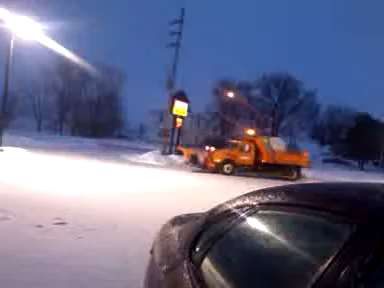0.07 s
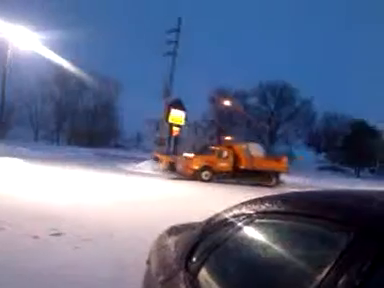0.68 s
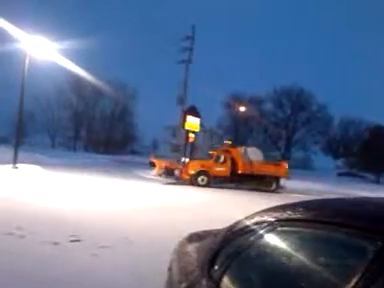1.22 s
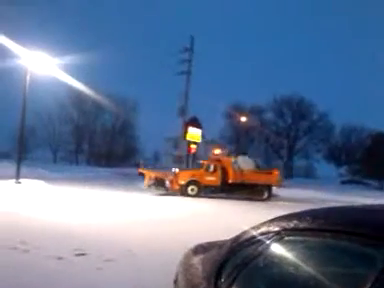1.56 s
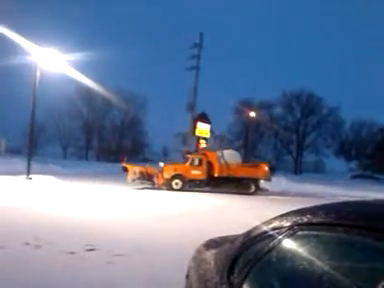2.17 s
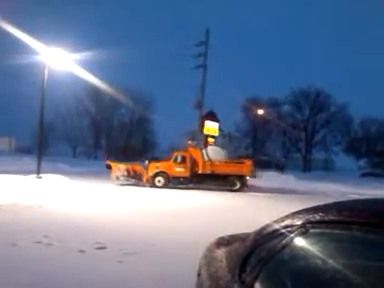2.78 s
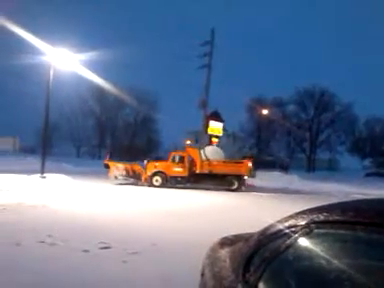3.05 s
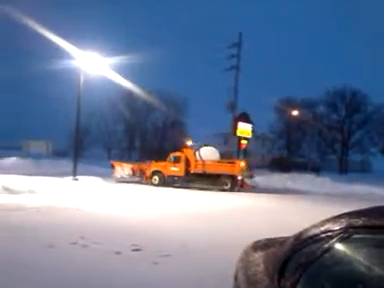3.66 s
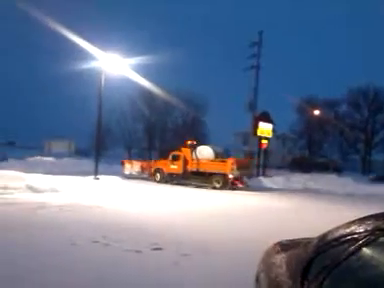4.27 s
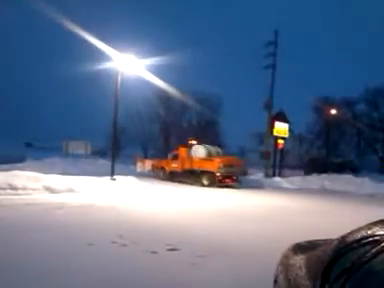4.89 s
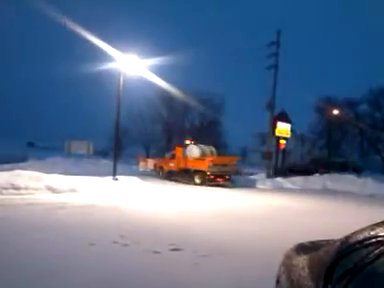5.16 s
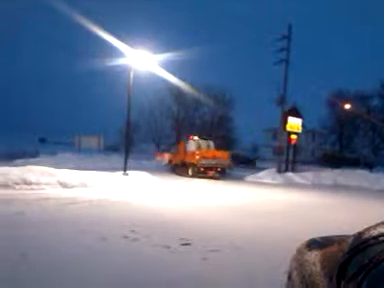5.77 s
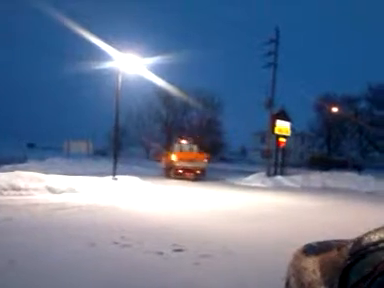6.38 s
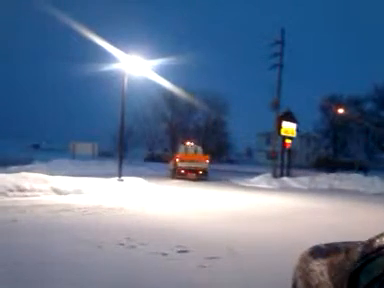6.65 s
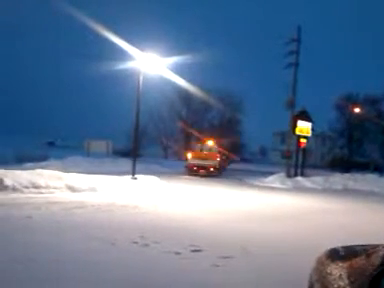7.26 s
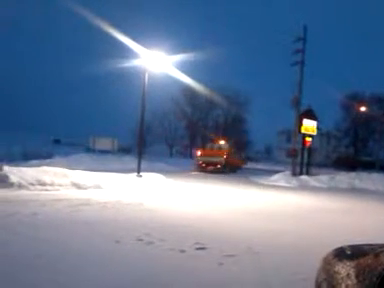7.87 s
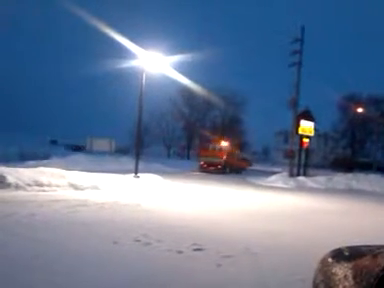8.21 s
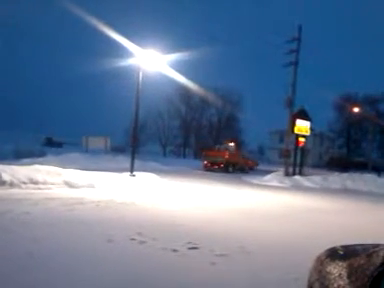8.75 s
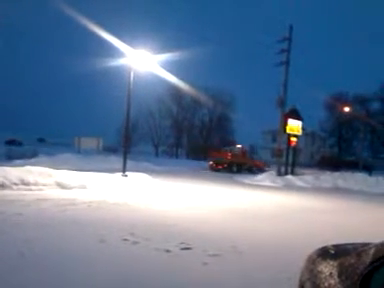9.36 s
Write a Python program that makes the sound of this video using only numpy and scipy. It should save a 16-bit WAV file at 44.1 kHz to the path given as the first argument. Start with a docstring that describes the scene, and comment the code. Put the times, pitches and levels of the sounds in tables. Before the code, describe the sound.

A diesel plow truck drives across a snowy lot, its blade faintly scraping, while gusty wind buffets the microphone.

```python
"""Plow truck on a windy, snowy lot

A diesel plow truck crosses the lot and turns away, its exhaust and roar pulsing with the firing,
its steel blade scraping and squeaking faintly. A low hum, like an idling car, lies underneath.
The microphone is a narrow-band phone out in the wind: gusts buffet its port and overload it,
and right at the microphone a finger ticks once on the case."""
import sys
import numpy as np
from scipy.fft import rfft, irfft, next_fast_len
from scipy.io import wavfile
from scipy.ndimage import uniform_filter1d, map_coordinates

SR = 44100
rng = np.random.default_rng(int(sys.argv[2]) if len(sys.argv) > 2 else 0)


def file_out(sig):
    """Save sig as 16-bit WAV at sys.argv[1]."""
    # one column per channel
    cols = np.atleast_2d(sig).T
    # limit, then scale
    lim = np.clip(cols, -1, 1)
    pcm = np.round(lim * 32767).astype(np.int16)
    wavfile.write(sys.argv[1], SR, pcm)


N = 425124


def truck(pulsing=0.21, jitter=0.02, rough_db=4, flicker_db=1.37, roar_trim_db=1.5, scrape_trim_db=3):
    """Three exhaust orders, with combustion roar and clatter that swell at each firing."""
    # Each row: time in seconds, firing rate in Hz.
    firing_rate = [(.7, 111.9), (2.5, 116.3), (4.7, 118.6), (5.2, 103.1), (5.7, 107), (6.3, 117),
                   (7, 117.9), (7.8, 118.4), (8.6, 116), (9.7, 118.8)]
    # Each row: time in seconds, exhaust level in dB at the firing rate and at three times that rate.
    exhaust_levels = [(.7, -37, -47), (2.5, -37.5, -47), (4, -33.5, -57), (4.7, -29.5, -51.5),
                      (5.2, -34, -49.5), (5.6, -37, -37.5), (6, -31, -57), (6.6, -33, -48.5),
                      (7.2, -34.5, -47), (7.7, -44, -43.5), (8.3, -33, -48), (9.7, -39.5, -44.5)]
    # Distance and heading set the noise. Each row: time in seconds, roar and clatter in dB before trim.
    pass_levels = [(.7, -42, -50), (1.15, -38.5, -43), (1.45, -38, -47), (2.2, -40.5, -45),
                   (2.95, -38, -43), (3.55, -38, -44.5), (3.98, -34, -43), (4.3, -40, -45.5),
                   (4.6, -35.5, -45.5), (5.3, -40, -44.5), (5.7, -39, -46.5), (6.0, -39, -44.5),
                   (6.45, -39.5, -48), (7.2, -43, -49.5), (7.75, -38, -47.5), (8.4, -42.5, -48),
                   (9.1, -40, -47), (9.64, -40.5, -47.5)]
    # Engine roar, then clatter and scrape. Each row: frequency in Hz, relative density in dB.
    roar_spectrum = [(25, -35.5), (60, -2), (85, 6.5), (130, 1), (230, -2.5), (330, -3), (470, -3.5),
                     (620, -0.5), (760, -1.5), (930, -4.5), (1300, -10.5), (2000, -26), (3500, -45)]
    scrape_spectrum = [(400, -17), (1000, 0), (1400, 4), (1900, 3), (2500, 2.5), (3200, 0), (4500, -8)]
    phase = turning(curves(firing_rate)[0] * (1 + jitter * wobble(30)))
    first_db, third_db = curves(exhaust_levels)
    roar_db, clatter_db = curves(pass_levels)
    orders = [(1, first_db), (2, first_db - 11), (3, third_db)]
    exhaust = sum(np.sqrt(2) * amp(db + rough_db * wobble(26)) * np.sin(k * phase) for k, db in orders)
    # six unequal cylinders repeat their pattern every two turns of the crank
    firing = unit(1 + pulsing * np.cos(phase) + 0.15 * np.cos(phase / 6))
    roar = amp(roar_db + roar_trim_db + flicker_db * wobble(16)) * noise(roar_spectrum)
    clatter = amp(clatter_db + scrape_trim_db + flicker_db * wobble(25)) * noise(scrape_spectrum)
    return exhaust + firing * (roar + clatter)


def blade(drone_hz=752, stutter_db=3.5, drone_trim_db=-0.5):
    """The steel blade drones as it drags, and rings or squeaks where it catches on packed snow."""
    # Each row: time in seconds, drone level in dB before trim.
    drag_levels = [(.7, -56), (2.5, -52), (3.0, -42.5), (3.6, -44.5), (4.2, -42.5), (5.1, -56.5),
                   (5.55, -43.5), (6.1, -54.5), (7.1, -51), (7.9, -53), (9.7, -56.5)]
    # Each row: peak time in seconds, half length in seconds, pitch in Hz, level in dB.
    squeaks = [(1.573, 0.073, 3320, -54.5), (2.983, 0.16, 3327, -50), (4.02, .2, 2436, -47),
               (4.023, .16, 1330, -46), (4.661, 0.25, 2386, -50)]
    drone_db, = curves(drag_levels)
    drone_gain = amp(drone_db + drone_trim_db + stutter_db * wobble(22))
    steel = drone_gain * np.sin(turning(drone_hz * (1 + 0.065 * wobble(110))))
    for s, length, hz, db in squeaks:
        ring = np.sin(turning(hz * (1 + 0.067 * wobble(220))))
        steel += amp(db + stutter_db * wobble(45)) * swell(s, length) * ring
    return np.sqrt(2) * steel


def wind(buffet_db=-3, flutter_db=-7, brightening=0.2, lump_db=3, lull_db=-30, limit=0.65):
    """Turbulence at the microphone port: low buffeting, and a patter that grows with the air speed."""
    # Buffeting, then the patter of small eddies. Each row: frequency in Hz, relative density in dB.
    buffet_spectrum = [(20, -62.5), (32, -40.5), (46, -25), (62, -11.5), (105, 1), (170, 1), (240, -6.5),
                       (330, -17), (450, -25.5), (800, -54)]
    flutter_spectrum = [(30, -51.5), (80, -15.5), (160, -1), (270, 1.5), (360, -6), (460, -13),
                        (600, -22.5), (900, -32.5), (1400, -40.5), (3500, -46)]
    level_db = wind_strength()
    lull_gain = 1 / (1 + amp(2 * (lull_db - level_db)))  # in the lulls the wind gives way to the engines
    buffet = amp(level_db + buffet_db + lump_db * wobble(55)) * even(noise(buffet_spectrum), span=0.025)
    patter = unit(coloured(puffs(rate=42, scatter_db=14), flutter_spectrum))
    flutter = amp(level_db + flutter_db + brightening * (level_db + 15.5)) * patter
    pressure = lull_gain * (buffet + lull_gain * flutter)
    # a soft limit keeps the wind's rumble rounded and free of clicks
    return limit * np.tanh(pressure / limit)


def wind_strength(unrest_db=3):
    """Strength of the wind in dB: gusts add their power to a restless breeze."""
    # Each row: time in seconds, relative strength between gusts in dB.
    breeze = [(.75, -23.5), (1.35, -17), (1.55, -19.5), (2.1, -16.5), (3.0, -17), (3.4, -23), (3.9, -17.5),
              (4.2, -25.5), (4.75, -22), (5.6, -27.5), (6.0, -19.5), (6.6, -25.5), (7.2, -23), (7.7, -31),
              (8.1, -20.5), (8.55, -22), (9.05, -26), (9.4, -27.5)]
    # Each row: peak time in seconds, half length in seconds, relative strength in dB.
    gusts = [(0.972, 0.15, -8), (1.276, 0.13, -10.5), (1.663, 0.041, -15), (1.887, 0.097, -8),
             (2.194, 0.12, -16.5), (2.513, .05, -15), (2.811, .06, -16), (3.105, 0.045, -15),
             (3.499, .07, -20), (3.834, .04, -15), (4.026, .045, -16.5), (4.252, .025, -15.5),
             (4.595, 0.13, -16.5), (5.046, .1, -21.5), (5.397, .04, -22.5), (5.822, 0.087, -18.5),
             (6.196, .12, -25), (6.832, 0.039, -12), (6.988, 0.048, -16), (7.366, .02, -19),
             (7.944, 0.075, -10.5), (8.17, 0.17, -15), (8.719, .025, -12), (8.844, 0.051, -12.5),
             (9.594, 0.04, -18)]
    breeze_db, = curves(breeze)
    power = amp(breeze_db + unrest_db * wobble(22)) ** 2
    for s, length, db in gusts:
        power += (amp(db) * swell(s, length)) ** 2
    return 10 * np.log10(power)


def puffs(rate, scatter_db):
    """An irregular train of pushes and pulls of air, about rate a second, of scattered size."""
    gap, direction, strength = rng.random((2000, 3)).T
    at = (np.cumsum(0.25 + 1.5 * gap) * SR / rate).astype(int)
    sizes = np.sign(direction - 0.5) * amp(scatter_db * strength)
    return np.bincount(at[at < N], sizes[at < N], N)


def eddies(trim_db=-4, steepness=4.11, rasp_db=-25, low_cut_hz=190, rise_ratio=0.86):
    """Each strong eddy thumps on the port: a brief puff that falls off steeply above its corner."""
    # Each row: peak time in seconds, width in seconds, level in dB before trim, corner in Hz.
    thumps = [(0.715, 0.0083, -14, 890), (0.847, 0.01, -6.5, 651), (.901, .009, -6.5, 1118),
              (.923, 0.012, -3.5, 439), (0.959, .007, -4.5, 536), (1.007, 0.011, -6, 378),
              (1.036, 0.012, -5.5, 667), (1.087, .007, -7.5, 353), (1.218, .007, -5.5, 321.5),
              (1.295, .008, -8.5, 353), (1.645, .004, -4, 414.4), (1.669, .016, -9.5, 390),
              (1.793, 0.0046, -8, 323), (1.867, .022, -6, 349), (1.894, .009, -7, 658),
              (1.995, 0.004, -3.5, 281.4), (2.821, 0.007, -9, 290), (3.096, .004, -9, 300),
              (3.142, .005, -8, 266), (3.729, 0.0044, -11, 276), (3.79, 0.017, -13, 503),
              (4.854, 0.0056, -10.5, 210), (5.118, 0.0054, -9.5, 245), (6.399, .006, -17.5, 342),
              (6.827, 0.013, -9.5, 346), (7.923, .013, -5.5, 443), (7.951, 0.0063, -5, 589),
              (7.973, 0.011, -6, 417.5), (8.18, .02, -12, 311), (8.838, .008, -11, 220)]
    out, size = np.zeros(N + SR), SR // 5
    t = (np.arange(size) - size // 2) / SR
    hz = np.fft.rfftfreq(size, 1 / SR) + 1
    for s, width, db, corner_hz in thumps:
        body = 1 / np.hypot(1, (hz / corner_hz) ** steepness)
        # only the brightest eddies carry a rasp that reaches far above the corner
        brightness = 1 / (1 + (520 / corner_hz) ** 6)
        rasp = amp(rasp_db) * brightness / np.hypot(1, hz / 1800)
        colour = (body + rasp) / np.hypot(1, (low_cut_hz / hz) ** 3)
        rush = unit(irfft(rfft(rng.standard_normal(size)) * colour, size))
        shape = np.exp(-(t / (width * np.where(t < 0, rise_ratio, 1))) ** 2 / 2)
        out[round(s * SR) - size // 2:][:size] += amp(db + trim_db) * shape * even(rush, span=0.006)
    return out[:N]


def finger_tick(at_s=1.5883, ring_db=-22, push_db=-11):
    """A finger on the phone: a short ring of the plastic case on top of one low push."""
    # Each row: frequency in Hz, relative density in dB.
    case_spectrum = [(1200, -34), (1800, 1), (2600, -6), (3500, 6), (4500, -33)]
    ring = even(noise(case_spectrum), span=0.001)
    return swell(at_s, 0.0014) * (amp(ring_db) * ring + amp(push_db))


def hum(waver_db=3):
    """The wavering tones of an idling engine, and a low drone that rises as the truck leaves."""
    # Each row: frequency in Hz, level in dB.
    idle_tones = [(43.3, -52), (65.2, -38.5), (108.5, -41), (259, -50)]
    # Each row: time in seconds, pitch in Hz, level in dB.
    drone_path = [(.7, 167.1, -43), (6.9, 169, -42.5), (7.5, 170.6, -39), (8.5, 169.7, -36.5),
                  (9.05, 172.4, -30.5), (9.4, 174, -35.5), (9.7, 175.2, -31.5)]
    speed = 1 + 0.012 * wobble(9)
    idle = sum(amp(db + waver_db * wobble(6.6)) * np.sin(turning(hz * speed)) for hz, db in idle_tones)
    drone_hz, drone_db = curves(drone_path)
    drone = amp(drone_db + waver_db * wobble(6)) * np.sin(turning(drone_hz + 3.5 * wobble(30)))
    return np.sqrt(2) * (idle + drone)


def amp(db):
    """Decibels to gain."""
    return 10 ** (np.asarray(db) / 20)


def unit(x):
    """Scale to rms 1."""
    return x / np.sqrt(np.mean(x ** 2) + 1e-20)


def curves(rows):
    """One value per sample for each column after the time."""
    s, *columns = np.transpose(rows)
    return [np.interp(np.arange(N) / SR, s, column) for column in columns]


def wobble(rate):
    """A smooth random curve, rate knots a second."""
    knots = rng.standard_normal(int(N * rate / SR) + 4)
    return map_coordinates(knots, [np.arange(N) * rate / SR])


def filtered(x, response):
    """x through a response given as a function of Hz."""
    size = next_fast_len(N + SR // 2)
    return irfft(rfft(x, size) * response(np.fft.rfftfreq(size, 1 / SR)), size)[:N]


def coloured(x, points):
    """x through a spectrum of (Hz, dB) points on a log axis."""
    point_hz, db = np.transpose(points)
    return filtered(x, lambda hz: amp(np.interp(np.log(hz + 1), np.log(point_hz), db)))


def noise(points):
    """Noise of rms 1 with the given spectrum."""
    return unit(coloured(rng.standard_normal(N), points))


def even(x, span):
    """x at rms 1, its strength held steady over spans of this many seconds."""
    size = max(int(span * SR), 2)
    power = uniform_filter1d(uniform_filter1d(x ** 2, size), size)
    return unit(x / np.sqrt(np.abs(power) + 1e-6))


def swell(s, length):
    """A bell-shaped envelope about time s, down to 1/e at length seconds either side."""
    return np.exp(-np.minimum(((np.arange(N) / SR - s) / length) ** 2, 50))


def turning(hz):
    """Phase of something that turns at hz."""
    return 2 * np.pi * np.cumsum(hz) / SR


def scene():
    """Everything that reaches the one microphone on the lot."""
    return (truck() + blade() + hum() + wind() + eddies() + finger_tick())[None]


def record(dry, start_s=0.686, ceiling=0.705, top_hz=15800):
    """The phone switches on, keeps the lows and the voice band, and clips on the hardest gusts."""
    # Each row: frequency in Hz, gain in dB.
    phone_response = [(20, -6), (45, 1.5), (3200, 0.5), (3500, -2.5), (3900, -11.5), (4300, -21.5),
                      (4700, -66), (5200, -100)]
    switched_on = np.arange(N) / SR > start_s
    narrow_band = coloured(dry[0] * switched_on, phone_response)
    clipped = np.clip(narrow_band, -ceiling, ceiling)
    return filtered(clipped, lambda hz: hz < top_hz)[None]


dry = scene()
out = record(dry)
file_out(out)
```